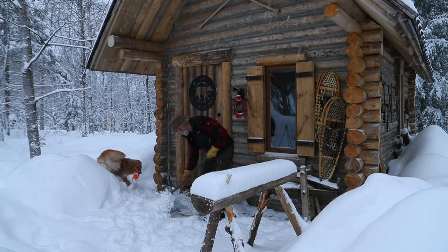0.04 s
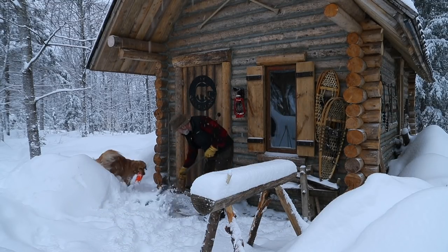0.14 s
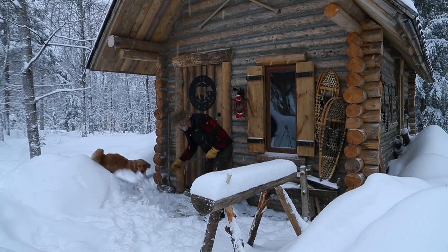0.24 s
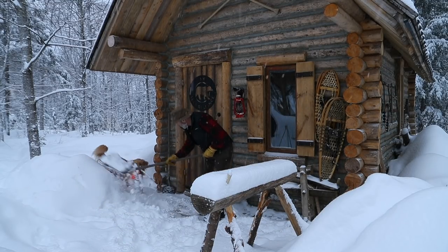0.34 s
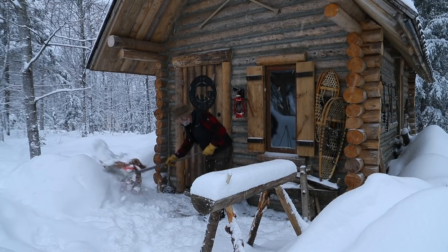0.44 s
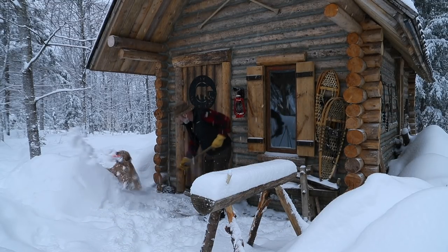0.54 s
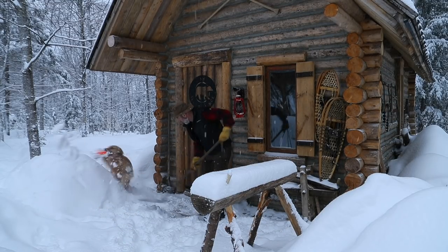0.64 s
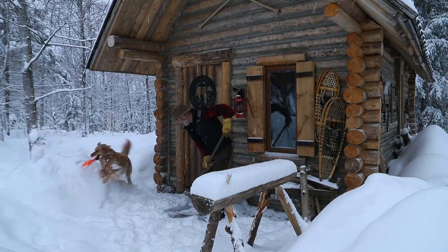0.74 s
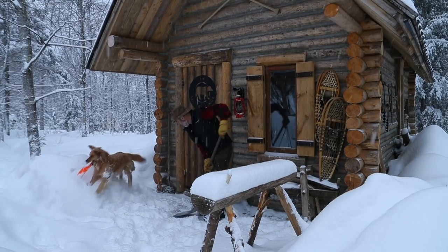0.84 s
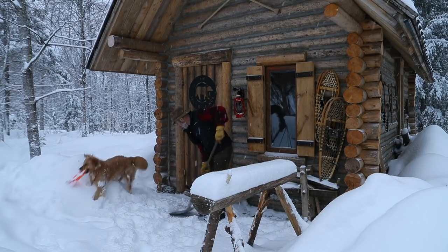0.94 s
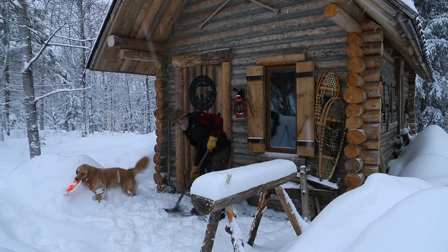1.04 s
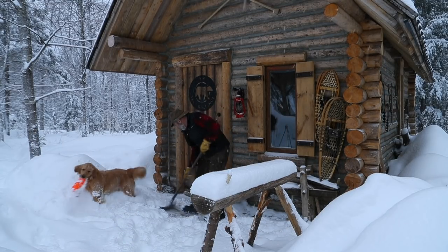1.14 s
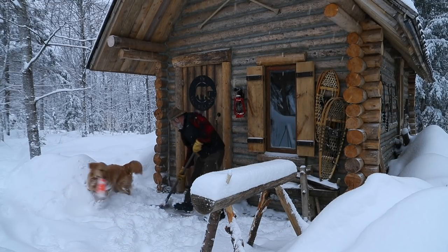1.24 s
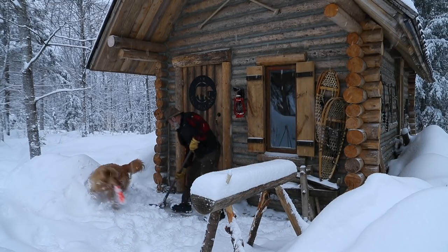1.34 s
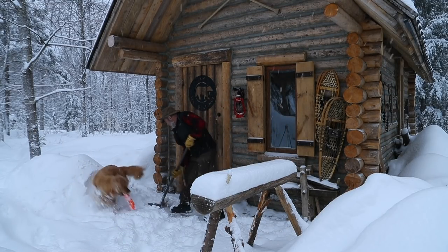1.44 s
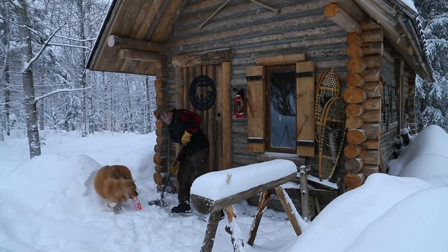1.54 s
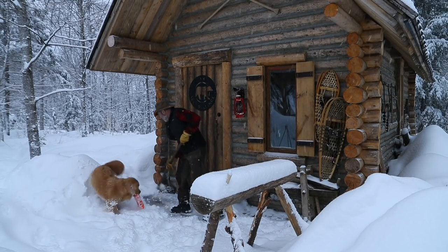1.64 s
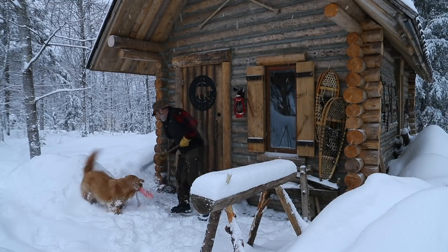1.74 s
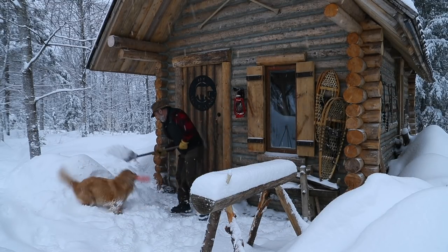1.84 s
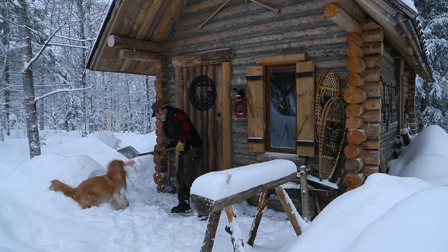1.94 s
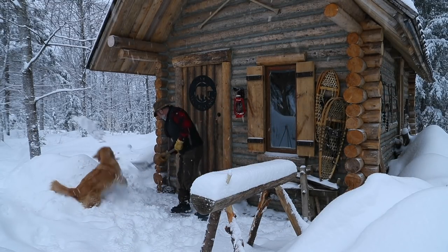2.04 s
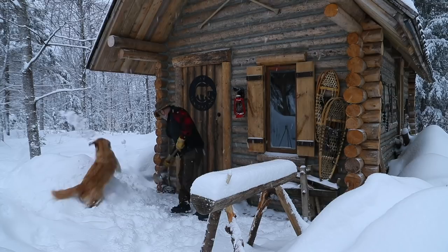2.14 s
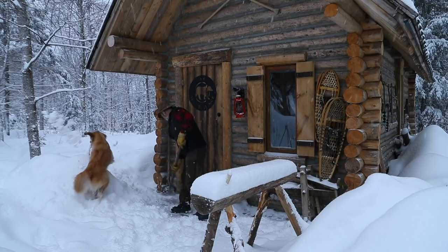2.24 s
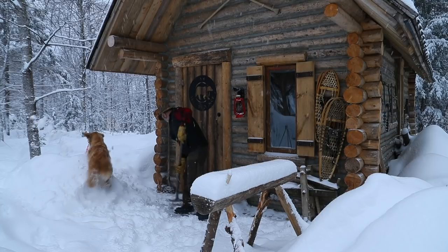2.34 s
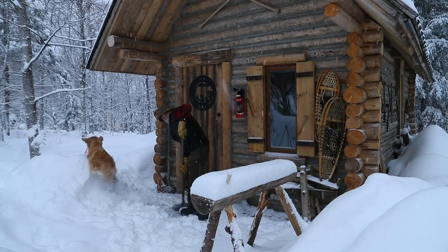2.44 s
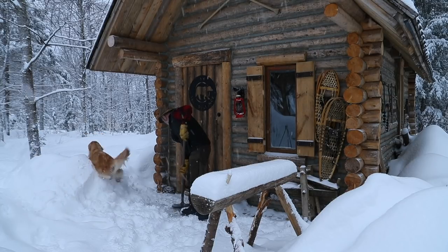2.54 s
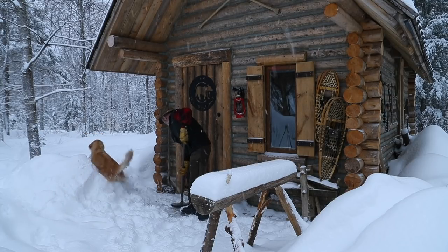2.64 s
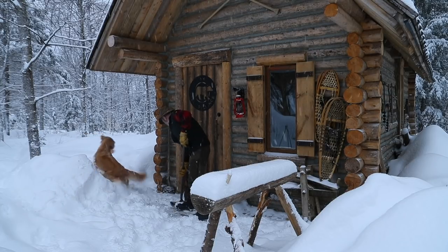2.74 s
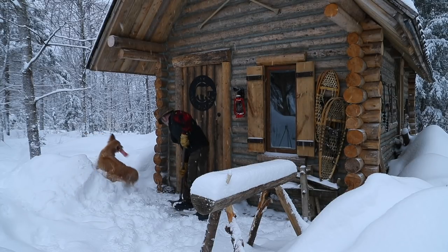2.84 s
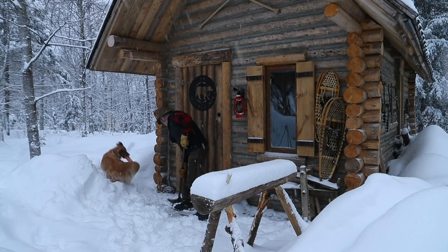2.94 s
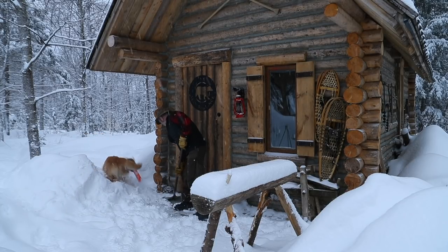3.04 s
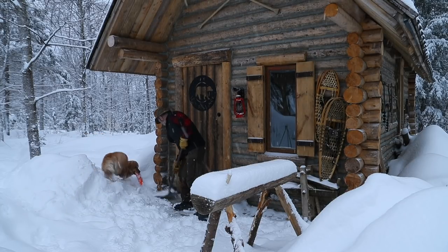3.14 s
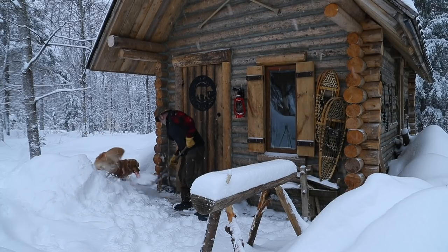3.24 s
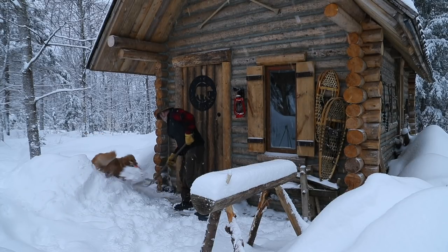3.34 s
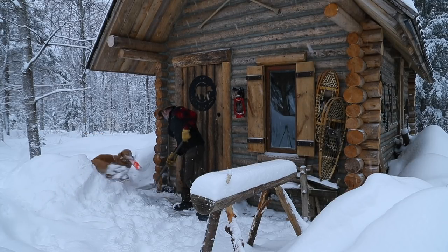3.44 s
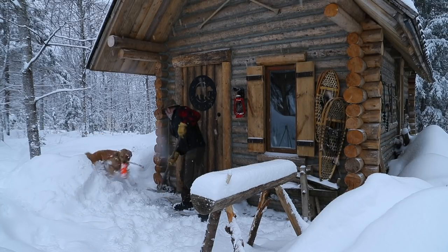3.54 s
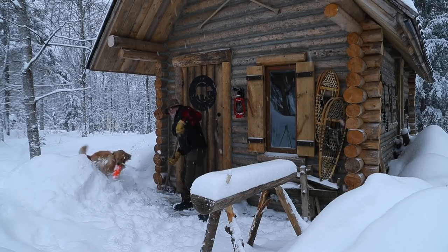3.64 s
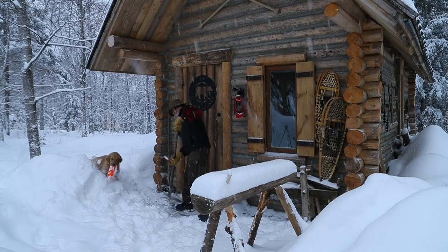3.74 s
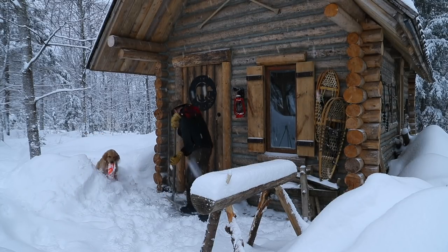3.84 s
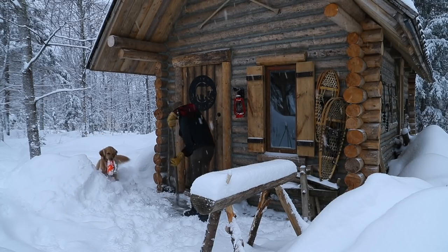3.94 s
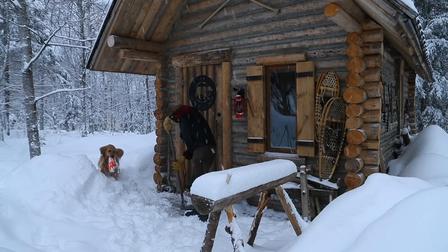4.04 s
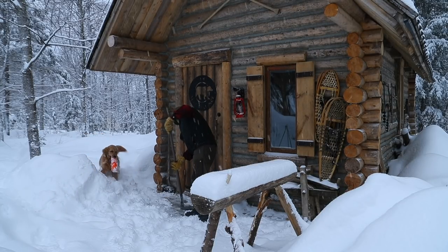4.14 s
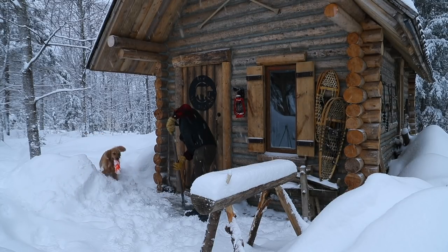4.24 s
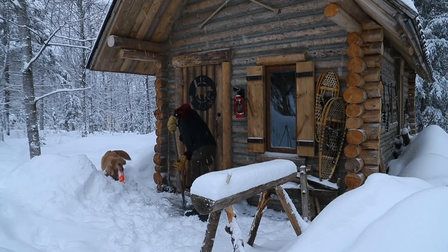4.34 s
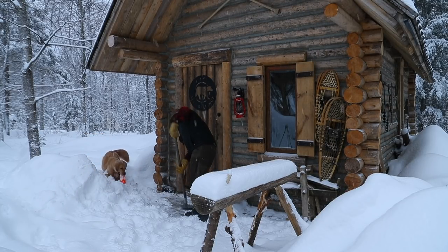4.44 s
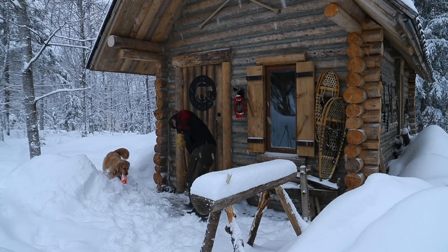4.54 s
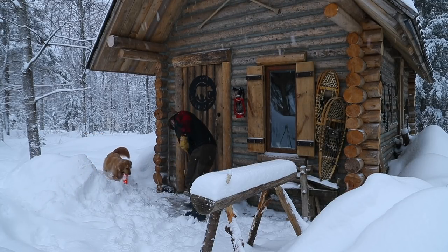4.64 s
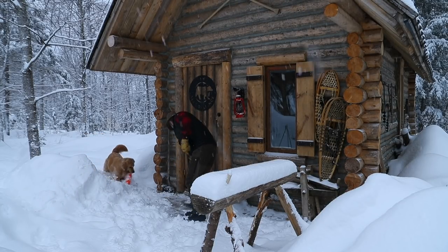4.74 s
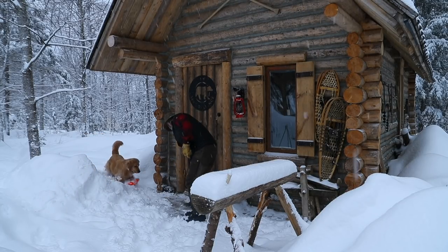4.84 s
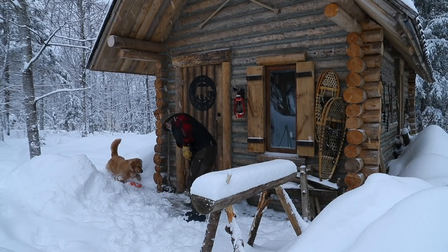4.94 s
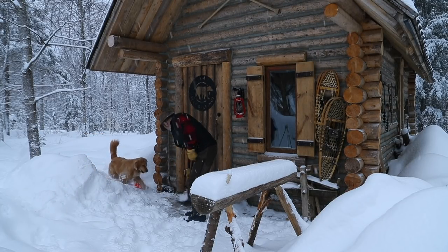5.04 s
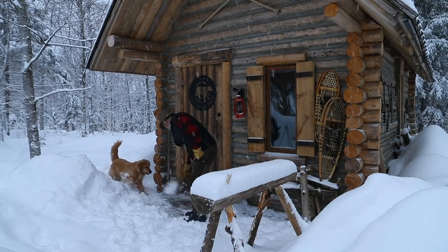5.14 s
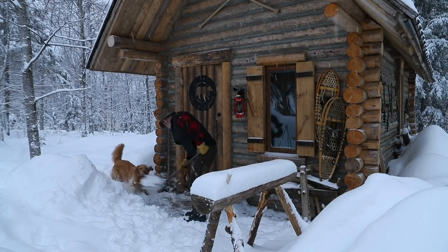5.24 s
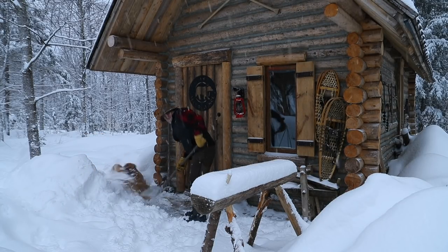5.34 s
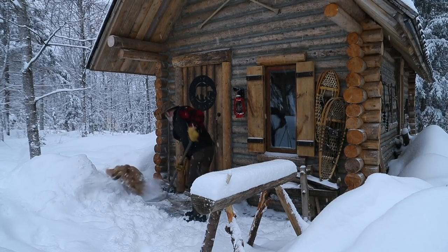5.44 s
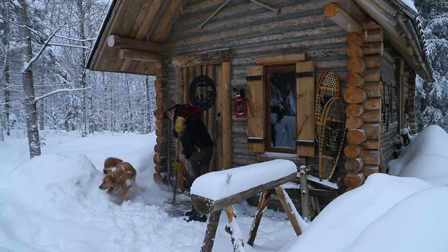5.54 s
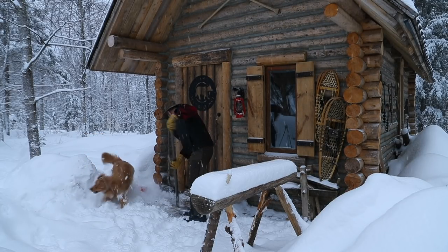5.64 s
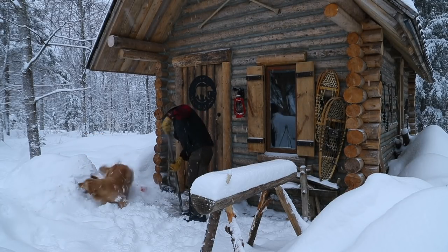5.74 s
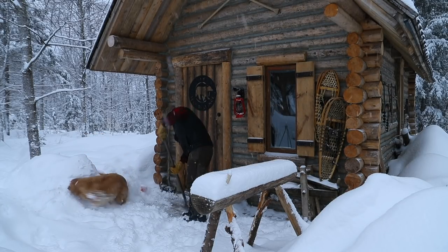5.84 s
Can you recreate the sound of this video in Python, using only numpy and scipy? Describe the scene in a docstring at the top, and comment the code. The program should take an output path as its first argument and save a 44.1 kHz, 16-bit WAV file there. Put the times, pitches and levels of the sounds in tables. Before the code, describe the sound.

Outdoors in still winter air, a shovel blade rasps and clunks on icy wood between pauses, with soft snow crunches, stamps and wind puffs.

```python
"""Outside a log cabin, a snow shovel scrapes along frozen boards in short strokes, knocking as it lands and catches.
Noisy slips at its edge drive the ringing blade and boards; knocks ring the same modes, and the blade hums or whistles.
Loose snow slides and boots and paws crunch, made from grainy noise; boots thud, ice snaps and a bit of metal clinks.
Light wind thumps the microphone over still winter air, and the log wall answers with a short fading echo."""
import sys
import numpy as np
from scipy import signal
from scipy.fft import rfft, irfft, next_fast_len
from scipy.io import wavfile
from scipy.ndimage import uniform_filter1d, map_coordinates

SR = 44100
rng = np.random.default_rng(int(sys.argv[2]) if len(sys.argv) > 2 else 0)


def master(y):
    """Save y as 16-bit WAV."""
    cut = np.clip(np.atleast_2d(y).T, -1, 1)
    pcm = np.round(cut * 32767)  # scale
    wavfile.write(sys.argv[1], SR, pcm.astype(np.int16))


def gain_from_db(level_db):
    """Turn a decibel level (scalar or array-like) into a linear amplitude factor."""
    decades = np.asarray(level_db, float) / 20
    return 10 ** decades


N = 260190  # length in samples

# tone of the still winter air: pitch_hz, shape_db
AIR_TONE = [(59, -42), (100, 9), (294, -1.5), (577, 1), (880, 4), (1620, -7), (3000, -2.5), (7270, -15.5),
            (12100, -13.5), (15600, -18)]
# tone of the wind's slow buffeting: pitch_hz, shape_db
GUST_TONE = [(8, -20), (20, 0), (45, -5), (90, -17), (160, -30), (300, -80)]
# strength of the buffeting over time: time_s, level_db
WIND_LEVEL = [(0, -62), (2.9, -58), (3.3, -48), (3.8, -44), (4.3, -43), (4.65, -52), (4.9, -41),
              (5.15, -42), (5.35, -37), (5.9, -39)]
# single puffs of wind on the microphone: start_s, level_db, pitch_hz
PUFFS = [(0.536, -20.5, 57), (0.944, -22, 95), (1.516, -26, 110.4), (1.955, -33, 50), (2.101, -17.5, 55.5),
         (3.392, -19, 28.8), (3.517, -24, 90), (4.156, -21, 29.4), (4.871, -12.5, 130), (4.951, -16, 34.7),
         (4.983, -6.5, 45.4), (5.018, -15.5, 26.3), (5.716, -10.5, 36.6), (5.761, -7, 48.4)]
# how long the log wall's answer takes to fall by 60 dB: pitch_hz, fade_s
WALL_FADE = [(200, 0.099), (2000, 0.025), (10000, 0.014)]
# a small metal part's ringing tones: pitch_hz, level_db, fade_s (to fall by 60 dB)
METAL_TONES = [(2080, -5, 0.07), (2557, -6, 0.09), (3620, -11, 0.04), (4230, -11, 0.04)]
# jolts of the metal part: start_s, level_db
CLINKS = [(2.051, -39), (2.268, -38)]
# thin, bright ice crusts snapping: start_s, peak_db
SNAPS = [(.67, -30), (.943, -18), (2.548, -17), (3.034, -30), (3.127, -13), (3.431, -23.5), (4.365, -32),
         (5.265, -24), (5.379, -41), (5.563, -22.5), (5.796, -20), (4.173, -30), (.631, -36)]
# boots stamping the boards: start_s, peak_db, pitch_hz
STAMPS = [(3.707, -28, 310), (3.73, -30, 346), (4.368, -27, 298), (4.871, -8, 310), (4.926, -18, 312),
          (5.116, -16.5, 255), (5.227, -21.5, 260), (5.44, -15.5, 289)]
# snow shifting under boots, paws and blade: loudest_s, rise_s, fall_s, crunch_db, powder_db
SHIFTS = [(.19, .03, 0.061, -47, -53.5), (.36, 0.055, 0.17, -48.5, -48), (.55, 0.02, 0.018, -41, -51.5),
          (.67, 0.067, 0.0096, -49, -51.5), (.82, 0.017, 0.11, -60, -50), (1.64, 0.19, 0.11, -47, -45.5),
          (1.84, 0.064, 0.067, -45, -51), (1.96, 0.08, 0.047, -42, -43), (2.07, 0.043, 0.047, -48.5, -55),
          (2.32, 0.11, 0.096, -42, -58), (2.542, 0.085, 0.16, -38, -37.5),
          (2.552, 0.0091, 0.012, -30, -29.5), (3.22, 0.069, 0.63, -52, -45),
          (3.58, 0.021, 0.062, -60, -45.5), (3.68, 0.048, 0.048, -50, -44),
          (3.86, 0.092, 0.048, -41.5, -52), (4.427, 0.076, 0.026, -39, -35.5),
          (4.48, 0.014, 0.027, -49, -35), (4.96, 0.11, 0.072, -44.5, -48.5),
          (5.083, 0.011, 0.034, -46, -33.5), (5.17, 0.061, 0.093, -44.5, -42),
          (5.27, 0.017, 0.036, -40, -43), (5.312, 0.025, 0.039, -47, -39),
          (5.384, 0.014, 0.033, -35, -37.5), (5.43, 0.019, 0.046, -30, -40.5),
          (5.63, 0.092, 0.042, -53, -52.5), (5.77, 0.051, 0.045, -40.5, -53)]
# snow noise that never stops: crunch_db, powder_db
SETTLING = (-60.5, -73)
# tone of packed snow crunching: pitch_hz, shape_db
CRUNCH_TONE = [(70, -18), (180, 0), (500, -1.5), (1000, -2.5), (1500, -9.5), (3000, -54)]
# tone of sliding powder: pitch_hz, shape_db
POWDER_TONE = [(760, -12.5), (1300, -13), (1610, -15.5), (1770, -12.5), (2870, -12.5), (8200, -28.5),
               (15600, -34.5)]
# faint whistles of a lightly dragged edge: loudest_s, half_length_s, pitch_hz, level_db
WHISTLES = [(3.62, 0.07, 2300, -48), (3.668, 0.035, 1607, -45), (4.415, .014, 5340, -45)]
# what blade and boards ring with: pitch_hz, width_hz, level_db
BODY_MODES = [(251, 34, -3), (330, 42, 2.5), (436, 39, 0.5), (548, 47, 2), (740, 83, 0), (993, 165, 3),
              (1150, 414, -3), (1500, 120, 2), (2017, 270, -8.5), (2500, 180, 2), (3160, 1130, -13.5),
              (4800, 96, -6)]
# knocks of blade and handle: start_s, peak_db, centre_hz, fade_s (to fall by 60 dB), rattle_share (0 to 1)
KNOCKS = [(0.336, -30, 700, 0.037, 0.9), (.631, -32, 1200, 0.02, 0.8), (0.658, -26.5, 800, 0.044, 0.6),
          (0.67, -25.5, 740, 0.026, 0.9), (.907, -12, 1760, 0.11, 0.7), (0.949, -7.5, 424, 0.2, 0.64),
          (1.643, -34, 960, 0.06, 0.9), (2.263, -23.5, 1680, 0.18, 0.73), (2.266, -24, 494, 0.083, 0.3),
          (2.272, -21, 850, 0.071, 0.72), (2.544, -4, 443, 0.1, 0.26), (2.546, -12, 1110, 0.14, 0.82),
          (2.571, -12.5, 740, 0.3, 0.2), (3.032, -9.5, 1920, 0.067, 0.96), (3.11, -12.5, 1150, 0.035, 0.4),
          (3.13, -15, 900, 0.17, 0.3), (3.354, -28.5, 1150, 0.061, 0.53), (3.468, -32, 965, 0.029, 0.1),
          (3.504, -25.5, 800, 0.11, 0.7), (3.519, -27.5, 436, 0.075, 1), (3.994, -26, 1080, 0.034, 1),
          (4.077, -7.5, 470, 0.37, 0.09), (4.171, -27.5, 2500, .04, 0.7), (4.368, -26, 2030, 0.023, 0.7),
          (4.498, -8.5, 427, 0.18, 0.17), (5.048, -26, 1150, 0.18, 0.53), (5.08, -25.5, 1500, 0.17, 0.8),
          (5.263, -26, 1100, 0.07, 0), (5.31, -36, 2500, 0.06, 0.9), (5.378, -29, 640, 0.16, 0.2),
          (5.562, -14, 800, 0.074, 0.02), (5.746, -36, 486, 0.048, 0.7), (5.796, -20.5, 3330, 0.091, 0.85)]
# one list for each stroke of the blade, pressure on the edge as scrape level: time_s, level_db
STROKES = [
    [(0.0, -22.5), (0.064, -19.5), (0.086, -30), (0.098, -19.5), (0.152, -30), (0.185, -56)],
    [(4.005, -48), (4.042, -23), (4.075, -19), (4.122, -20), (4.166, -43), (4.175, -36), (4.205, -35.5),
     (4.24, -51)],
    [(4.493, -24.5), (4.498, -12.5), (4.51, -12.5), (4.524, -20), (4.628, -17), (4.77, -37.5)],
    [(4.773, -38.5), (4.845, -20), (4.872, -20), (4.89, -28.5), (4.95, -53)],
    [(5.797, -34.5), (5.821, -34.5), (5.861, -14.5), (5.9, -17)],
    [(0.942, -26.5), (0.948, -15), (1.005, -22), (1.022, -18), (1.046, -21.5), (1.088, -16), (1.106, -22),
     (1.164, -20.5), (1.174, -20), (1.188, -20), (1.207, -25), (1.216, -31.5), (1.232, -26.5),
     (1.434, -38.5), (1.51, -32.5), (1.6, -55)],
    [(2.613, -22.5), (2.628, -18), (2.74, -18.5), (2.776, -22), (2.79, -17.5), (2.81, -24.5), (2.858, -16),
     (2.9, -21), (2.93, -18), (2.95, -23), (2.97, -21), (3.008, -25), (3.027, -28), (3.038, -17.5),
     (3.056, -25.5), (3.086, -24.5), (3.113, -22), (3.121, -32), (3.127, -20.5), (3.137, -23), (3.15, -36),
     (3.2, -45)],
]
# what each stroke runs over: hiss_db (over scrape), hiss_loss_db_per_s (snow packs the edge), rumble_db (over scrape)
GROUND = [(-7.5, 105, -2.5), (-9, 17, -6.5), (-10, 21, -8), (-10.5, 51, -10.5), (-10, 9, -7),
          (-5, 11, -6.5), (-7.5, 12.5, -8)]
# tone of the scraping blade: pitch_hz, shape_db
SCRAPE_TONE = [(500, -19), (850, 1.5), (1200, 1), (1740, -2.5), (3530, -4.5), (5500, -21), (7000, -78)]
# tone of the rumbling boards: pitch_hz, shape_db
BOARD_TONE = [(40, -56), (130, -12.5), (300, 0), (450, 1), (620, 4), (900, -34)]
# tone of the ice hiss: pitch_hz, shape_db
ICE_TONE = [(2650, -26.5), (4500, -4.5), (5340, -5), (7370, -11.5), (9310, -12), (10500, -13),
            (13600, -18.5), (15600, -28)]
# tone of the singing blade: pitch_hz, shape_db
HUM_TONE = [(500, -65), (680, 20.5), (745, 23), (800, -1), (1000, -55)]
# when the blade sings: loudest_s, rise_s, fall_s, level_db
HUMS = [(.005, .02, 0.017, -21), (.11, 0.049, 0.028, -27), (1.045, 0.022, 0.02, -28),
        (1.16, 0.032, 0.05, -15), (1.25, 0.013, 0.14, -36)]

AIR_DB, WALL_DB = -52, -14.0
SNAP_FADE_S, SNAP_HZ = 0.012, 2100
STAMP_FADE_S, STAMP_RISE_S, STAMP_SLAP_DB = 0.031, 0.0032, -8
KNOCK_RISE_S = 0.00052  # contact is cushioned by snow
CONTACT_S = 0.003  # the edge meets and leaves the boards this fast
LANDING_DB, LANDING_S = 12.5, 0.0045  # the boards boom more as the edge lands
GRIT_PER_S, GRIT_DB = 150, -11.5  # larger ice lumps breaking under the edge


def unit(x):
    """Scales a sound to an rms level of 1."""
    return x / np.sqrt(np.mean(x ** 2) + 1e-20)


def along(points, hz):
    """Reads a curve of (pitch_hz, value) points on a log pitch axis."""
    f, value = np.transpose(points)
    return np.interp(np.log(hz + 1), np.log(f + 1), value)


def wobble(rate):
    """A smooth random curve with rate knots a second."""
    knots = rng.standard_normal(int(N * rate / SR) + 4)
    return map_coordinates(knots, [np.arange(N) * rate / SR])


def swell(loudest_s, rise_s, fall_s):
    """A rounded rise to 1 at loudest_s and a rounded fall."""
    t = np.arange(N) / SR - loudest_s
    return np.exp(-(t / np.where(t < 0, rise_s, fall_s)) ** 2)


def filtered(x, response):
    """Filters x by a complex response given as a function of frequency."""
    m = next_fast_len(x.shape[-1] + 8192)
    spectrum = rfft(x, m) * response(np.fft.rfftfreq(m, 1 / SR))
    return irfft(spectrum, m)[..., :x.shape[-1]]


def resonance(f, hz, width):
    """One ringing mode with a gain of 1 at its centre."""
    return 1j * f * width / (hz * hz - f * f + 1j * f * width)


def body(f, direct):
    """Modes of blade and boards, over a share of sound that comes straight from the contact."""
    response = direct
    for k, (hz, width, db) in enumerate(BODY_MODES):
        response = response + (-1) ** k * gain_from_db(db) * resonance(f, hz, width)
    return response


def coloured(x, tone, ring=0):
    """Gives x a tone, and the body modes raised to the power ring, at rms 1."""
    return unit(filtered(x, lambda f: gain_from_db(along(tone, f)) * np.abs(body(f, direct=0.27)) ** ring))


def slips(rate, spread_db, smooth, patchy_db):
    """Tiny breaks of random size over smooth rubbing; the rough surface favours now one band, now another."""
    chance, size, rub = rng.random(N), rng.random(N), rng.standard_normal((2, N))
    breaks = (chance < rate / SR) * gain_from_db(spread_db * size) * np.sign(rub[0])
    train = unit(breaks) + smooth * rub[1]
    z = signal.stft(train, nperseg=512)[2]
    patches = uniform_filter1d(rng.standard_normal(z.shape), size=2, axis=0)  # blurred across pitch
    patches = uniform_filter1d(patches, size=6, axis=1)  # blurred across time
    return signal.istft(z * gain_from_db(patchy_db * unit(patches)), nperseg=512)[1][:N]


def winter_air():
    """Still winter air: steady noise with a fixed tone."""
    return gain_from_db(AIR_DB) * coloured(rng.standard_normal(N), AIR_TONE)


def wind():
    """Slow buffeting, with puffs that push the microphone's membrane out and back."""
    s, db = np.transpose(WIND_LEVEL)
    t = np.arange(N) / SR
    gusts = gain_from_db(2.5 * wobble(8)) * rng.standard_normal(N)
    out = gain_from_db(np.interp(t, s, db)) * coloured(gusts, GUST_TONE)
    for s, db, hz in PUFFS:
        u = np.clip((t - s) * hz, 0, 9)  # cycles since the puff began
        strength = 7 * u * u * np.exp(-3.2 * u) * (u < 9)
        out += gain_from_db(db) * strength * -np.cos(2 * np.pi * u)
    return out


def wall(x):
    """The log wall's answer: a noise tail in which each frequency dies at its own speed."""
    hz, t, z = signal.stft(rng.standard_normal(SR // 2), SR, nperseg=256)
    fade = gain_from_db(-60 * t / along(WALL_FADE, hz)[:, None])
    tail = signal.istft(z * fade, SR, nperseg=256)[1]
    delayed = np.pad(x, (450, 0))  # about 10 ms
    return signal.fftconvolve(delayed, tail / np.linalg.norm(tail))[:N]


def clinks():
    """The metal part rings briefly when jolted: fading sines, mixed a little differently each time."""
    out, t = np.zeros(N), np.arange(SR // 5) / SR
    for s, db in CLINKS:
        ring = 0
        for hz, level, fade_s in METAL_TONES:
            strength = gain_from_db(level + rng.normal(0, 4.4) - 60 * t / fade_s)
            ring = ring + strength * np.sin(2 * np.pi * hz * t)
        out[round(s * SR):][:len(t)] += gain_from_db(db) * ring
    return out


def snaps():
    """Ice breaks in a very short broad crack: a click and fading noise through a wide resonance."""
    out, t = np.zeros(N + SR), np.arange(SR // 20) / SR
    for s, db in SNAPS:
        burst = rng.standard_normal(len(t)) + 14 * (t == 0)
        burst = burst * gain_from_db(-60 * t / SNAP_FADE_S)
        crack = filtered(burst, lambda f: resonance(f, SNAP_HZ, 2 * SNAP_HZ))
        out[round(s * SR):][:len(t)] += gain_from_db(db) * crack / np.abs(crack).max()
    return out[:N]


def stamps():
    """A boot lands soft and dry: a few fading low swings of the board and a short dull slap."""
    out, t = np.zeros(N + SR), np.arange(SR // 10) / SR
    shape = (1 - np.exp(-(t / STAMP_RISE_S) ** 2)) * gain_from_db(-60 * t / STAMP_FADE_S)
    for s, db, hz in STAMPS:
        slap = unit(filtered(rng.standard_normal(len(t)), lambda f: resonance(f, 1.69 * hz, hz) ** 2))
        swing = np.sin(2 * np.pi * hz * t)
        thud = shape * (swing + gain_from_db(STAMP_SLAP_DB) * slap)
        out[round(s * SR):][:len(t)] += gain_from_db(db) * thud / np.abs(thud).max()
    return out[:N]


def snow():
    """Packed snow gives way in dull clumps; powder slides with a soft fizz."""
    crunch, powder = gain_from_db(SETTLING)
    for s, rise, fall, crunch_db, powder_db in SHIFTS:
        shift = swell(s, rise, fall)
        crunch = crunch + gain_from_db(crunch_db) * shift
        powder = powder + gain_from_db(powder_db) * shift
    tread = wobble(22.104)  # each shift of weight moves clumps and powder together
    clumps = gain_from_db(2.0 * tread) * slips(rate=700, spread_db=5.0, smooth=0.83, patchy_db=4.0)
    fizz = gain_from_db(0.52 * tread) * slips(rate=4400, spread_db=9.0, smooth=0.7, patchy_db=2.5)
    return crunch * coloured(clumps, CRUNCH_TONE) + powder * coloured(fizz, POWDER_TONE, ring=0.085)


def whistles():
    """The lightly dragged edge whistles: rubbing noise through one narrow mode of the blade."""
    rub = rng.standard_normal(SR // 4)
    middle = len(rub) // 2
    out, t = np.zeros(N), (np.arange(len(rub)) - middle) / SR
    for s, half, hz, db in WHISTLES:
        tone = unit(filtered(rub, lambda f: resonance(f, hz, 0.05 * hz) ** 2))
        out[round(s * SR) - middle:][:len(t)] += gain_from_db(db) * np.exp(-(t / half) ** 2) * tone
    return out


def knocks():
    """A push and a dying rattle ring the body modes near the centre of each blow."""
    out, t = np.zeros(N + SR), np.arange(SR // 5) / SR
    for s, db, hz, fade_s, share in KNOCKS:
        def near(f):
            return body(f, direct=0.29) * resonance(f, hz, 0.42 * hz) ** 2

        def wide(f):
            dull = (1 + 1j * f / (2.66 * hz)) ** 4  # the contact is too soft for treble
            return body(f, direct=0.3) * resonance(f, hz, 2.4 * hz) / dull

        fall = gain_from_db(-60 * t / fade_s)
        push = unit(filtered(1. * (t == 0), near) * np.sqrt(fall))
        rattle = unit(filtered(rng.standard_normal(len(t)) * fall, wide))
        blow = np.sqrt(1 - share) * push + np.sqrt(share) * rattle
        blow = blow * (1 - np.exp(-t / KNOCK_RISE_S))
        out[round(s * SR):][:len(t)] += gain_from_db(db) * blow / np.abs(blow).max()
    return out[:N]


def strokes(fade):
    """Gains of scrape, rumble and hiss, all following the pressure; silent between strokes."""
    t, out = np.arange(N) / SR, 0
    for rows, (hiss_db, loss_db, rumble_db) in zip(STROKES, GROUND):
        s, db = np.transpose(rows)
        age = np.clip(t - s[0], 0, s[-1] - s[0])
        gate = np.clip(np.minimum(t - s[0], s[-1] - t) / fade + 1, 0, 1)
        rumble = rumble_db + LANDING_DB * np.exp(-age / LANDING_S)
        hiss = hiss_db - loss_db * age
        out = out + gate * gain_from_db(np.interp(t, s, db) + [0 * t, rumble, hiss])
    return out


def shovel():
    """The edge stutters over ice on the boards: one train of slips drives blade, boards, hum and hiss."""
    scrape, rumble, hiss = strokes(fade=CONTACT_S)
    chatter = gain_from_db(0.66 * wobble(29.91) + 1.1 * wobble(90))  # pressure on the edge is uneven
    edge = chatter * slips(rate=4000, spread_db=9.0, smooth=0.65, patchy_db=2.6)
    edge = edge + gain_from_db(GRIT_DB) * slips(rate=GRIT_PER_S, spread_db=7.0, smooth=0, patchy_db=2.5)
    blade = coloured(edge, SCRAPE_TONE, ring=0.62)
    boards = coloured(edge * gain_from_db(1.9 * wobble(45)), BOARD_TONE, ring=0.37)
    singing = sum(gain_from_db(db) * swell(s, rise, fall) for s, rise, fall, db in HUMS)
    hum = singing * coloured(edge, HUM_TONE)
    return scrape * blade + rumble * boards + hum + hiss * coloured(edge, ICE_TONE)


def scene():
    """Everything near the door, its echo, still winter air and wind, as one channel."""
    near = shovel() + snow() + knocks() + stamps() + whistles() + clinks() + snaps()
    echo = gain_from_db(WALL_DB) * wall(near)
    return (near + echo + winter_air() + wind())[None]


def band_limit(x):
    """A steep low-pass at the top of the band."""
    return signal.sosfilt(signal.butter(12, 15710, fs=SR, output="sos"), x)


def record(dry):
    """The microphone input smoothly rounds off the highest peaks, staying below 0.9."""
    soft = dry / (1 + np.abs(dry / 0.9) ** 5) ** (1 / 5)
    return band_limit(soft)


dry = scene()
out = record(dry)
master(out)
```